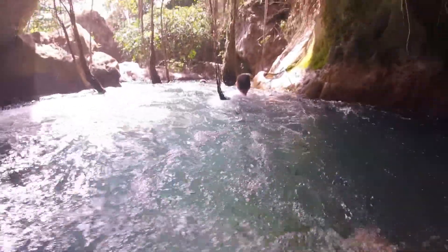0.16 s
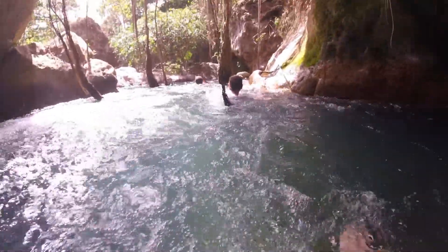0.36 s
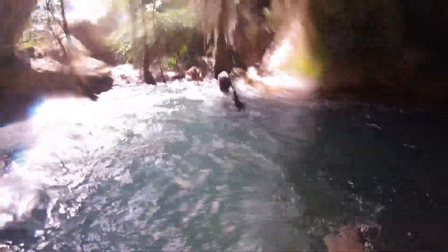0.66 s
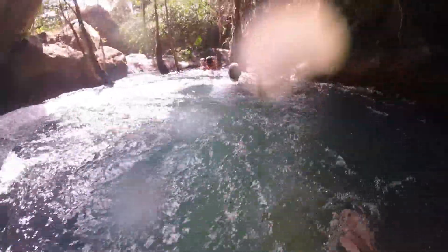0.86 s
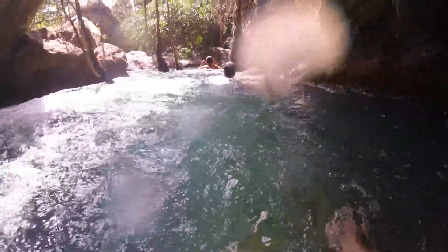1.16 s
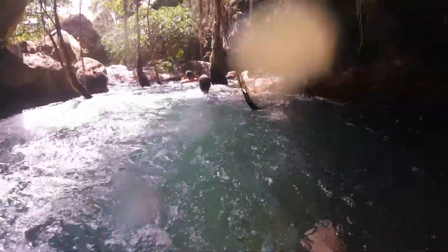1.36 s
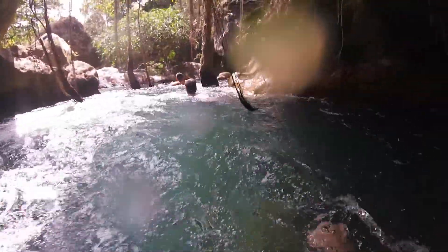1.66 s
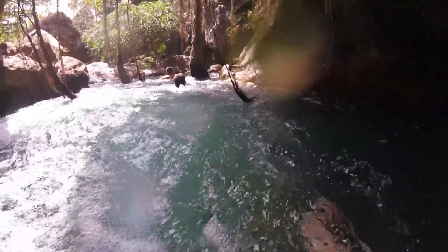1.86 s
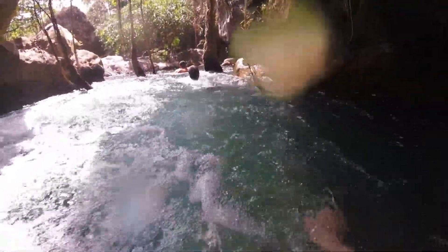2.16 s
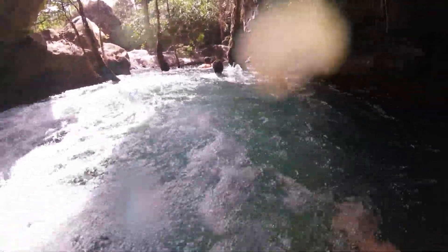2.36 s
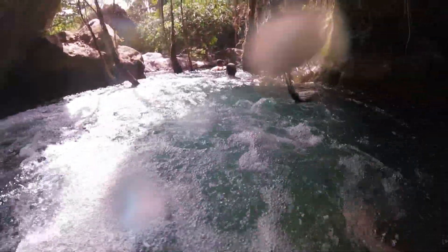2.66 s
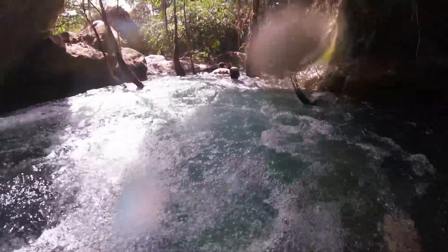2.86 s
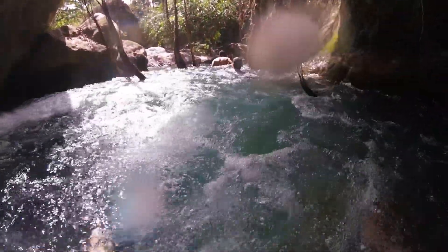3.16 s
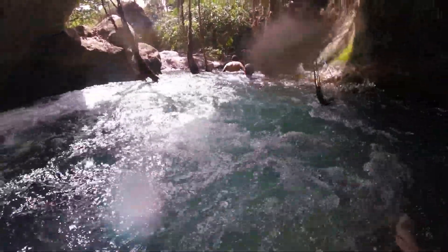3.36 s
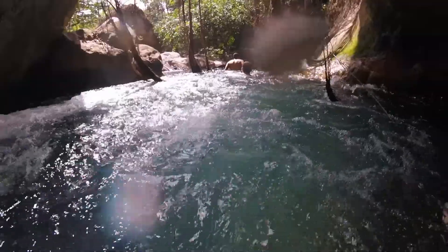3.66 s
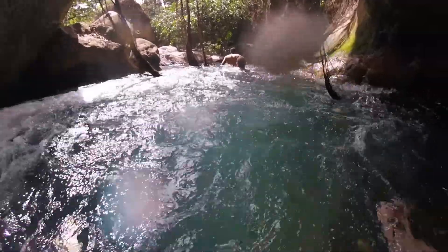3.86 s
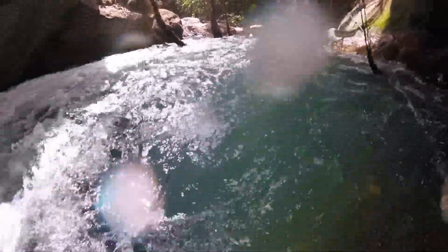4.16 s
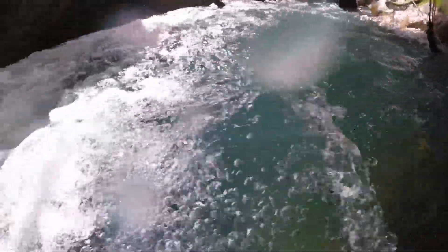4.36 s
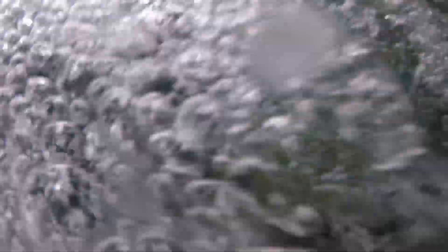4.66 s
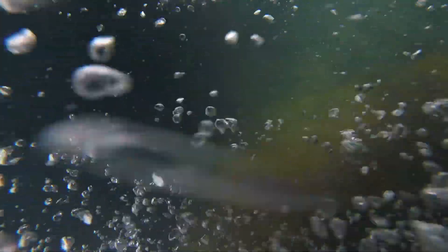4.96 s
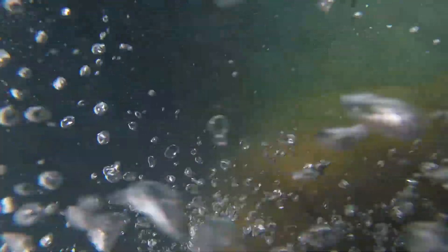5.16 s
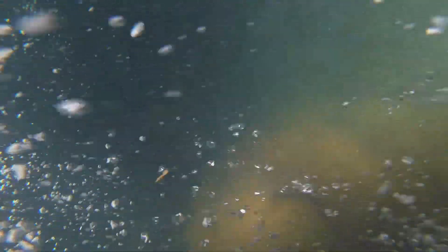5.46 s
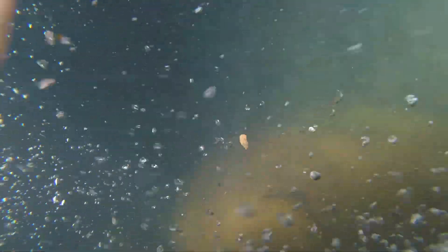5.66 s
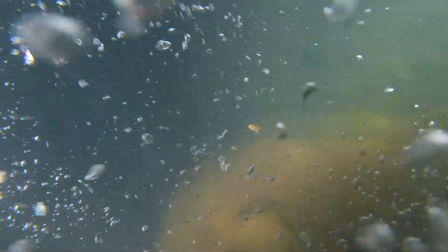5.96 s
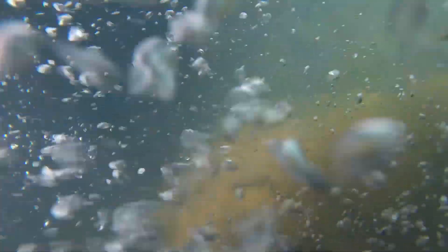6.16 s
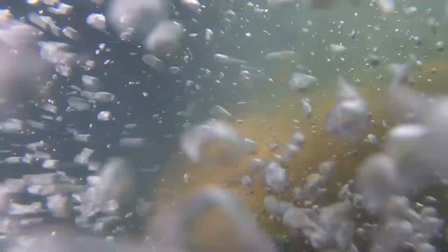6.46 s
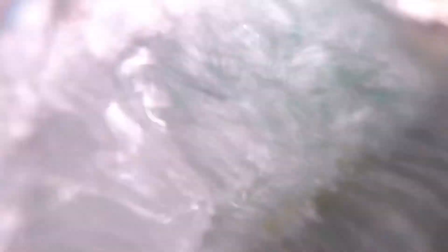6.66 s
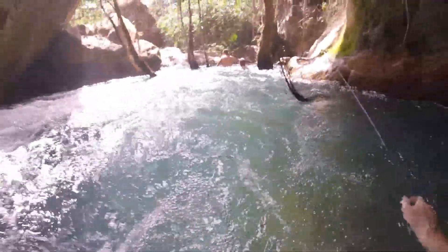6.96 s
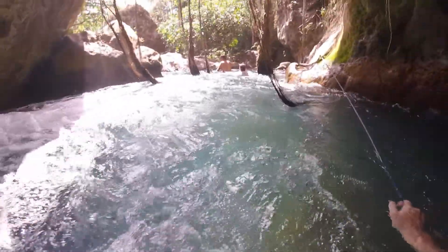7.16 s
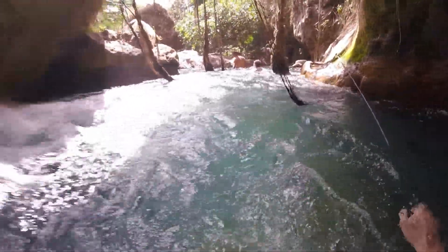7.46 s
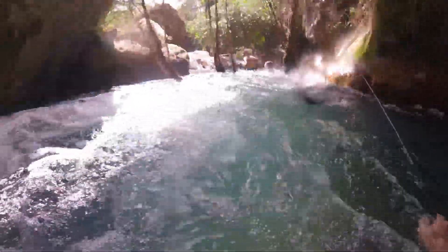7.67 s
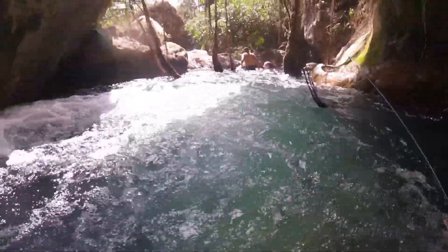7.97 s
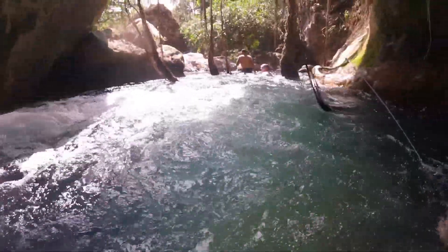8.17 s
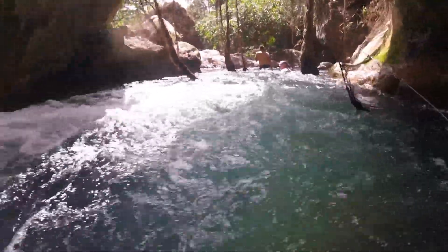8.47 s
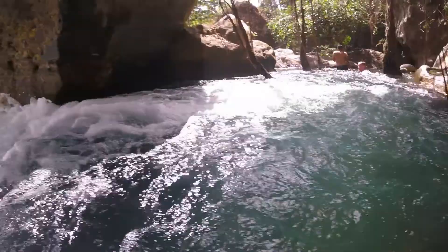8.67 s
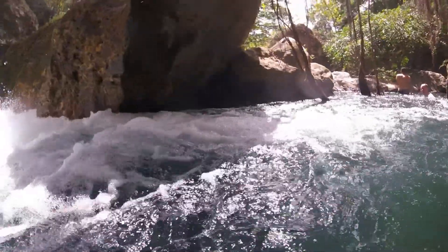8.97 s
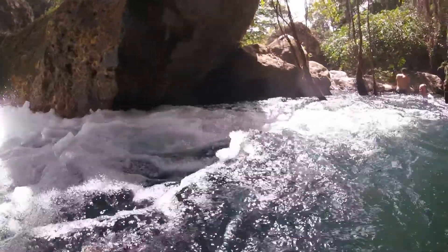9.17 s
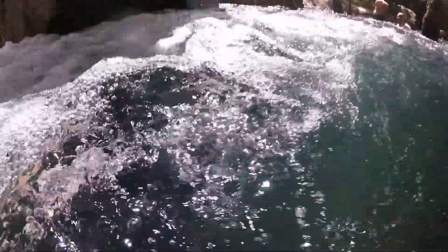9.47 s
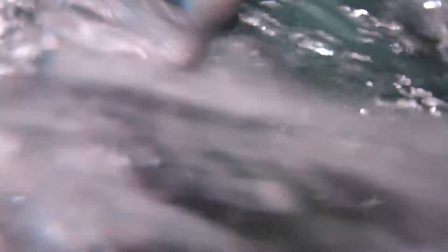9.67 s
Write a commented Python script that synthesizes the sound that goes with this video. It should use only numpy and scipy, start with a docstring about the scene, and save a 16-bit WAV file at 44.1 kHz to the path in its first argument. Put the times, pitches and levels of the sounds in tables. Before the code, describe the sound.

A small waterproof camera bobs in a waterfall pool, its sound narrow and mono. From 0 s the water is soft and muffled, gradually rising; at about 1.2 s a film bursts and bright, airy hiss opens over a lumpy low roar, swelling until 4.7 s. Low slaps knock the housing near 1.3 and 3.8 s, and running drops briefly bend the hiss downward at 3.2, 3.5 and 4.4 s. Around 4.75-5 s foam splutters, drops tick and pockets gurgle. From 5 to 6.65 s it is underwater: dull rumble, a short hum of trapped air, close plops and pops thickening after 6.1 s, with fizz. It surfaces quiet and clogged, thumped at 7, 7.5 and hardest 8.15 s, when the hiss snaps back. It rushes steadily until 9.55 s, slaps and gurgles, then plunges around 9.7 s with a sharp bubble burst into near silence.

```python
"""A waterfall, heard from its pool through the narrow microphone port of a small bobbing waterproof camera.
Above water it is noise: lumpy roar, spray, a resonance of the port that moves with the water in it, and a fine
high hiss called mist. The camera dips under the foam twice: a dull rumble, bubbles and a hum of trapped air remain.
Water slaps the housing as short low swings; single bubbles, cracks and flung drops sound close to the port.
One microphone, copied to both channels, with a faint hiss and its top cut."""
import sys
import numpy as np
from scipy import signal
from scipy.fft import rfft, irfft, next_fast_len
from scipy.io import wavfile
from scipy.ndimage import uniform_filter1d

SR = 44100
rng = np.random.default_rng(int(sys.argv[2]) if len(sys.argv) > 2 else 0)


def digitize_waveform(pressure):
    """Quantize a signal to 16-bit integers and store it at the path in sys.argv[1].

    Rows of a 2-D input are taken as channels; values are limited to [-1, 1].
    """
    field = np.atleast_2d(pressure).T
    bounded = np.clip(field, -1, 1)
    quanta = np.round(bounded * 32767).astype(np.int16)
    wavfile.write(sys.argv[1], SR, quanta)


N = 433062


def from_db(db):
    """Decibels to gain."""
    return 10 ** (np.asarray(db) / 20)


def rms_one(x):
    """Scale to rms 1."""
    return x / np.sqrt(np.mean(x ** 2) + 1e-20)


def gains(spans):
    """Level columns as gains in time, silent between the spans, with 4 ms fades."""
    t, out = np.arange(N) / SR, 0
    for rows in spans:
        s, *columns = np.transpose(rows)
        inside = np.clip(np.minimum(t - s[0] + .004, s[-1] + .004 - t) / .004, 0, 1)
        out = out + inside * from_db([np.interp(t, s, column) for column in columns])
    return out


def at_hz(points, hz):
    """Read a spectrum in dB on a log frequency axis."""
    points = np.array(points)
    return np.interp(np.log(hz + 1), np.log(points[:, 0]), points[:, 1])


def drift(rate_hz):
    """Slow random wander with spread 1: noise through two equal low-pass poles, one step per 40 samples."""
    r = np.exp(-80 * np.pi * rate_hz / SR)
    noise = rng.standard_normal(N // 40 + 2002)
    slow = signal.lfilter([1], [1, -2 * r, r * r], noise)[2000:]   # skip the settling of the filter
    return np.interp(np.arange(N) / 40, np.arange(len(slow)), rms_one(slow))


def coloured(spectrum):
    """Noise with a steady spectrum; rms 1."""
    size = next_fast_len(N)
    hz = np.arange(size // 2 + 1) * SR / size
    shaped = rfft(rng.standard_normal(size)) * from_db(at_hz(spectrum, hz))
    return rms_one(irfft(shaped, size)[:N])


def moving_colour(shape_db, low_hz, high_hz):
    """Noise whose spectrum shape_db(Hz, s) changes in time; each frame is levelled to rms 1 in the band given."""
    hz, s, frames = signal.stft(rng.standard_normal(N), SR, nperseg=512, noverlap=384)
    gain = from_db(shape_db(hz[:, None], s))
    band = (hz > low_hz) & (hz < high_hz)
    gain = gain / np.sqrt(np.sum(gain[band] ** 2, axis=0) / len(hz))
    return signal.istft(frames * gain, SR, nperseg=512, noverlap=384)[1][:N]


def ring(clicks, hz, t60):
    """A two-pole resonance: a unit click sets a sine of height 1 ringing, 60 dB down after t60 seconds."""
    r, w = from_db(-60 / (t60 * SR)), 2 * np.pi * hz / SR
    return signal.lfilter([0, np.sin(w)], [1, -2 * r * np.cos(w), r * r], clicks + 1e-18)


def peak(s, when, rise_s, fall_s):
    """A triangle of height 1."""
    return np.interp(s, [when - rise_s, when, when + fall_s], [0, 1, 0])


# The sway of the housing in the swell. Each row: frequency in Hz, density in dB per Hz (relative).
BOB_SPECTRUM = [(10, -24.5), (22, 3), (40, -5.5), (70, -13.5), (150, -78)]
BOB_DB = -37


def bobbing():
    """The housing bobs in the swell: the lowest noise, fading where both roar and rumble are very quiet."""
    roar, rumble = gains(ABOVE)[0], gains(BELOW)[0]
    open_port = np.clip(roar / from_db(-37.5) + rumble / from_db(-48), 0, 1)
    return open_port * from_db(BOB_DB + 2.0 * drift(2.9)) * coloured(BOB_SPECTRUM)


# Air caught under the housing, by the microphone.
# Each row: start in seconds, length in seconds, resonance in Hz, level in dB before its lumps.
TRAPPED = [(5.066, 0.27, 590, -33), (5.298, 0.58, 356, -39)]
TRAPPED_CYCLES = 8.1   # t60 of the resonance, in cycles


def trapped_air():
    """Trapped air hums while bubbles shake it: lumpy noise in one resonance, quick to start, fading at the end."""
    out, lumps = np.zeros(N), from_db(4.2 * drift(22))
    for s, length, hz, level_db in TRAPPED:
        t, t60 = np.arange(round(length * SR)) / SR, TRAPPED_CYCLES / hz
        once = ring(rng.standard_normal(SR), hz, t60)
        hum = rms_one(ring(once, hz, t60))[-len(t):]
        shape = np.interp(t, [0, .01, 0.72 * length, length], [0, 1, 1, 0])
        out[round(s * SR):][:len(t)] += shape * from_db(level_db) * hum
    return lumps * out


def swarm(per_s, low_hz, high_hz, cycles, spread_db):
    """Bubbles are born in clumps, each with a random loudness and one of twelve pitches; the flooded port dulls them."""
    loudness = from_db(spread_db * np.minimum(rng.exponential(1, N), 4)) * rng.choice([-1, 1], N)
    born = rng.random(N) < per_s * from_db(4.0 * drift(14)) / SR
    dealt = rng.integers(0, 12, N)   # which of the twelve pitches each bubble takes
    pitches = np.geomspace(low_hz, high_hz, 12)
    rings = sum(ring(loudness * born * (dealt == k), hz, cycles / hz) for k, hz in enumerate(pitches))
    dulling = signal.butter(4, 0.84 * high_hz, fs=SR, output="sos")
    return rms_one(signal.sosfilt(dulling, rings))


# Microphone under water, one list per dip. Each row: time in seconds, rumble in dB before its lumps,
# big bubbles in dB, middle bubbles in dB before a 5.5 dB lift, fizz in dB.
BELOW = [
    [(5.008, -25, -35, -42, -52), (5.06, -19, -31.5, -54, -75), (5.15, -27.5, -30.5, -56, -70),
     (5.32, -29, -35.5, -41.5, -57), (5.4, -34, -28.5, -46, -54), (5.5, -33.5, -35, -43.5, -66),
     (5.63, -30, -28.5, -36, -47), (5.72, -28.5, -37, -41.5, -62), (5.8, -32.5, -31, -45.5, -59),
     (6.0, -36, -35.5, -41.5, -65), (6.14, -30, -26, -37.5, -45), (6.24, -31, -29, -31, -60),
     (6.3, -36, -36.5, -42.5, -44), (6.42, -32, -35.5, -37.5, -58), (6.52, -37, -36, -38, -51.5),
     (6.6, -19, -41, -27.5, -40), (6.66, -44, -54, -36, -53), (6.72, -42, -57, -59, -66),
     (6.9, -54, -51, -53, -71)],
    [(9.741, -35, -47, -42, -44), (9.75, -17, -19.5, -37, -44), (9.768, -18.5, -29, -13.5, -29),
     (9.776, -40, -31, -50, -45), (9.82, -38, -38, -40, -39)],
]
# Rumble heard through the water. Each row: frequency in Hz, density in dB per Hz (relative).
RUMBLE_SPECTRUM = [(15, -19), (30, 22), (100, 23.5), (250, 16), (500, -53)]
RUMBLE_LUMPS_DB = 3.0


def underwater():
    """Dull rumble and bubbles in three ranges of pitch; the highest merge into a fine fizz."""
    rumble, big, middle, fizz = gains(BELOW)
    out = rumble * from_db(RUMBLE_LUMPS_DB * drift(4.0)) * coloured(RUMBLE_SPECTRUM)
    out += big * swarm(180, low_hz=276, high_hz=842, cycles=14.0, spread_db=2.0)
    out += middle * from_db(5.5) * swarm(950, low_hz=730, high_hz=1904, cycles=18.7, spread_db=3.5)
    return out + fizz * swarm(900, low_hz=1940, high_hz=3720, cycles=26.0, spread_db=6.5)


# Water against the housing. Each row: centre in seconds, peak in dB, frequency in Hz,
# half length of the swell in cycles (to where it is down to exp(-2)).
SLAPS = [(0.021, -21.5, 50, 0.74), (.96, -18.5, 69.5, 0.82), (1.258, -13, 48, 0.65),
         (3.791, -10, 44.6, 0.29), (4.848, -22, 44.6, 0.68), (4.931, -14.5, 75, 0.7),
         (5.179, -12, 46.7, 0.6), (6.126, -18, 79.6, 1.2), (6.154, -14.5, 111.6, 1.4),
         (6.555, -20, 69.5, 1.2), (6.597, -19.5, 36.3, 0.76), (6.974, -23.5, 155, 1.4),
         (6.99, -12, 59.8, 0.14), (7.443, -10.5, 56.6, 1.05), (7.584, -11.5, 40.5, 1.35),
         (8.015, -16.5, 57.7, 1.5), (8.123, -25, 152.4, 9.2), (8.164, -7, 59, 0.81), (9.572, -14, 70, 0.71),
         (9.598, -14, 90, 1)]


def slaps():
    """A wave pushes the housing in and it swings back: a low cosine under a bell-shaped swell."""
    out, t = np.zeros(N), np.arange(N) / SR
    for s, level_db, hz, cycles in SLAPS:
        near = slice(max(round((s - .1) * SR), 0), round((s + .1) * SR))
        turns = (t[near] - s) * hz
        out[near] += from_db(level_db) * np.cos(2 * np.pi * turns) * np.exp(-2 * (turns / cycles) ** 2)
    return out


# Single bubbles at the port. Each row: start in seconds, level in dB before swell and decay,
# starting pitch in Hz, t60 in seconds.
POPS = [(.123, -28, 1800, 0.022), (4.864, -14, 895, .027), (4.913, -22, 5200, 0.013),
        (4.925, -14, 340, 0.024), (4.959, -18, 2450, 0.02), (4.973, -16.5, 2100, .014),
        (5.0088, -13.5, 795, 0.02), (5.0176, -5.5, 530, 0.023), (5.034, -5.5, 530, 0.024),
        (5.0386, 4.5, 533, 0.015), (5.05, -7, 253, 0.037), (5.075, -23, 610, 0.027),
        (5.102, -17, 594, 0.12), (5.172, -4, 302, 0.015), (5.211, -21, 566, 0.045), (5.222, -18, 535, 0.05),
        (5.235, -21.5, 593, 0.032), (5.273, -13, 519, 0.055), (5.319, -9.5, 328, 0.06),
        (5.338, -27, 1600, .015), (5.386, -25, 1490, 0.017), (5.436, -15, 316, 0.032),
        (5.508, -12, 583, 0.036), (5.582, -18.5, 335, 0.05), (5.584, -18, 700, 0.043),
        (5.625, -8.5, 390, 0.031), (5.657, -24.5, 2950, 0.015), (5.704, -18.5, 1310, 0.029),
        (5.708, -15.5, 350, 0.08), (5.783, -16.5, 2130, 0.022), (5.827, -17, 370, 0.036),
        (5.831, -15.5, 790, 0.018), (5.865, -32, 2680, .02), (5.882, -12.5, 585, 0.05),
        (5.929, -6.5, 472, 0.033), (5.931, -12.5, 910, 0.048), (5.974, -17.5, 700, 0.043),
        (5.978, -41, 2900, .012), (6.04, -38, 3340, .012), (6.023, -24, 1580, 0.025),
        (6.085, -15.5, 527, 0.037), (6.094, -16.5, 1100, 0.028), (6.093, -23.5, 2190, 0.029),
        (6.133, -19, 305, .036), (6.136, -10, 930, 0.026), (6.159, -18, 1280, 0.022),
        (6.171, -10, 770, 0.025), (6.185, -4, 544, 0.031), (6.211, -5.5, 950, .027),
        (6.236, -18, 1290, 0.022), (6.238, -14, 895, 0.03), (6.265, -15, 913, 0.035),
        (6.2745, -33, 2900, 0.01), (6.297, -30, 2700, 0.013), (6.298, -22, 1640, .02),
        (6.314, -19, 1100, .02), (6.32, -18, 706, 0.021), (6.351, -6, 1200, 0.037), (6.354, -6, 1495, 0.02),
        (6.382, -9, 516, 0.037), (6.386, -10.5, 860, 0.027), (6.412, -17.5, 1200, 0.045),
        (6.462, -12, 936, 0.029), (6.517, -16.5, 625, 0.034), (6.536, -18, 1540, .02),
        (6.573, -14, 865, .028), (6.611, -13.5, 1320, .025), (6.645, -33, 2930, 0.016),
        (6.651, -11.5, 1470, 0.026), (6.665, -20, 1150, 0.025), (6.681, -33.5, 2620, 0.022),
        (9.561, -14.5, 2815, .014), (9.628, -9.5, 246, 0.046), (9.629, -11, 1120, 0.018),
        (9.643, -22, 1850, .012), (9.677, -20, 4750, .01), (9.743, -3, 850, 0.015),
        (9.746, -3, 1038, 0.033), (9.7511, -4, 980, 0.043), (9.7607, -1.5, 1190, 0.031),
        (9.767, -3, 1150, .013), (9.768, -15, 2390, .015), (9.775, -25, 950, .012), (9.797, -14, 1270, .01),
        (9.804, -7, 1050, 0.0057), (9.8095, -16, 1000, .008)]
POP_SWELL_CYCLES = 0.32


def pops():
    """Each bubble swells within a cycle or so and rings down with rising pitch."""
    out, t = np.zeros(N + 8192), np.arange(8192) / SR
    for s, level_db, hz, t60 in POPS:
        phase = 2 * np.pi * hz * (t + 0.86 * t * t)
        swell = (1 - np.exp(-t * hz / POP_SWELL_CYCLES)) ** 2
        out[round(s * SR):][:8192] += np.sin(phase) * swell * from_db(level_db - 60 * t / t60)
    return out[:N]


def bursts(events, t60):
    """A puff of white noise at each event, dying at once."""
    out, t = np.zeros(N + 2048), np.arange(2048) / SR
    for (s, level_db), noise in zip(events, rng.standard_normal((len(events), 2048))):
        out[round(s * SR):][:2048] += noise * from_db(level_db - 60 * t / t60)
    return out[:N]


# Bubbles pinching off sharply by the port. Each row: time in seconds, level in dB before dulling.
CRACKS = [(4.864, -27), (4.925, -20), (4.959, -34), (4.973, -40), (5.009, -28), (5.019, -33), (5.035, -33),
          (5.039, -20), (5.783, -28), (5.93, -35), (6.351, -20.5), (6.65, -35), (9.561, -36), (9.628, -30),
          (9.747, -18), (9.761, -14), (9.764, -23), (9.768, -19), (9.797, -32), (9.804, -29)]
# Flung drops on the microphone capsule. Each row: time in seconds, level in dB before the band filter.
STRIKES = [(4.7922, 2.5), (4.7972, 5.5), (4.8626, 0.5), (4.868, -9), (4.9094, -9), (4.9449, -4), (9.56, -7)]
CRACK_T60_S, STRIKE_T60_S, STRIKE_BAND_HZ = .005, 0.016, (6160, 6770)


def cracks():
    """Pinch-off cracks are dulled by the water; drop strikes sound around the pitch of the capsule."""
    dull = signal.lfilter(*signal.butter(3, 4200, fs=SR), bursts(CRACKS, CRACK_T60_S))
    strikes = bursts(STRIKES, STRIKE_T60_S)
    return dull + signal.lfilter(*signal.butter(2, STRIKE_BAND_HZ, "band", fs=SR), strikes)


# Each time the microphone comes up. Each row: breaks the surface in seconds, film over the port bursts
# in seconds, drain time in seconds (e-fold), how far low the ring starts in Hz, treble in the first moment in dB.
SURFACINGS = [(-.03, 1.217, 0.34, 1340, 15), (6.666, 8.175, 0.28, 200, -12)]


def since_burst(s, lasts_s):
    """1 while the film seals the port, dying away once it bursts."""
    out = np.ones(len(s))
    for (up, burst, *_), lasts in zip(SURFACINGS, np.broadcast_to(lasts_s, 2)):
        out = np.where(s > up, np.exp(-np.maximum(s - burst, 0) / lasts), out)
    return out


# Drops running across the port, pulling its ring down.
# Each row: centre in seconds, fall of the ring in Hz, half length in seconds.
DROPS = [(3.228, 1030, 0.093), (3.513, 430, 0.08), (4.395, 1380, 0.056), (9.632, 1200, 0.064)]


def drops(s):
    """How far each drop covers the port, 0-1."""
    cover = np.array([peak(s, when, half, half) for when, _, half in DROPS])
    return np.sin(np.pi / 2 * cover) ** 2


# Resonance of the microphone port. Each row: time in seconds,
# top of its ring in Hz before the sweep after a burst and the drops.
PORT_RING = [(1.2, 5690), (1.7, 6293), (2.3, 6234), (3.15, 6040), (3.98, 5940), (4.04, 6420), (4.4, 6300),
             (4.47, 7800), (4.54, 9100), (4.66, 8870), (4.75, 9300), (4.82, 7800), (5.0, 8260), (8.1, 6100),
             (8.6, 5850), (9.3, 6010), (9.42, 6280), (9.6, 6160), (9.69, 7400), (9.72, 8300)]
CAPSULE_HZ = 6500   # fixed resonance of the capsule
SWEEP_S = 0.13   # the ring climbs to its place after a burst
ON_CAPSULE_HZ, PAST_CAPSULE_HZ = 400, 990   # how near counts as on the capsule, from below and from above
SEALED_TOP_HZ, SEALED_WIDTH_HZ = 6660, 9000
# width of a 6 kHz ring, e-fold per this much higher, its limit; share of narrowing on the capsule
WIDTH_HZ, WIDENS_HZ, WIDEST_HZ, SHARPENS = 1500, 1300, 4000, 0.7


def port(s):
    """Port state at times s: ring on the capsule 0-1, film 0-1, top of the ring Hz, its width below Hz."""
    _, burst, drains, low_hz, _ = np.transpose(SURFACINGS)
    top = np.interp(s, *np.transpose(PORT_RING))
    top = top - sum(hz * peak(s, when, 1, SWEEP_S) for when, hz in zip(burst, low_hz))
    top = top - np.array(DROPS)[:, 1] @ drops(s)
    reach = np.where(top < CAPSULE_HZ, ON_CAPSULE_HZ, PAST_CAPSULE_HZ)
    on_capsule = 1 / (1 + ((top - CAPSULE_HZ) / reach) ** 2)
    width = np.minimum(WIDTH_HZ * np.exp((top - 6000) / WIDENS_HZ), WIDEST_HZ)
    width = width * (1 - SHARPENS * on_capsule)
    sealed = since_burst(s, OPENS_S) == 1
    on_capsule = on_capsule * ~sealed * (1 - drops(s).max(axis=0))
    top, width = np.where(sealed, SEALED_TOP_HZ, top), np.where(sealed, SEALED_WIDTH_HZ, width)
    return on_capsule, since_burst(s, drains), top, width


SOFTENS_HZ = 1800   # the upper edge spreads e-fold per this much higher


def edge_spread(s):
    """A low ring has a tight upper edge, a high one a wide edge."""
    _, _, top, _ = port(s)
    return np.clip(np.exp((top - 6000) / SOFTENS_HZ), .3, 1.25)


# Pockets of air in the foam, ringing as they close over the port.
# Each row: start in seconds, length in seconds, from Hz, to Hz, lift in dB.
POCKETS = [(4.01, 0.085, 2400, 2450, 11.5), (4.766, 0.12, 1700, 5000, 9), (4.83, 0.076, 1850, 1350, 24),
           (4.878, 0.059, 1070, 2570, 18), (4.916, 0.056, 2730, 2400, 18), (9.621, 0.023, 895, 1300, 13)]


def pockets_db(hz, s):
    """Each pocket lifts a gliding band of the spray, swelling and dying; without hz, the lift on top of the band."""
    out = 0
    for when, length, from_hz, to_hz, lift_db in POCKETS:
        done = np.clip((s - when) / length, 0, 1)
        centre = from_hz + (to_hz - from_hz) * done
        off = 0 if hz is None else (hz / centre - 1) / .16
        out = out + lift_db * np.sin(np.pi * done) / (1 + off ** 2)
    return out


# foam covers the port in patches
CHURN_FROM_S, CHURN_TO_S, CHURN_PATCH_DB, CHURN_RING_DB = 4.735, 5.0, 7.5, -6


def churning(s):
    """True while foam churns over the port."""
    return (s > CHURN_FROM_S) * (s < CHURN_TO_S)


def patches_db(hz, s):
    """Patches about 1.5 kHz by 15 ms come and go while foam churns over the port."""
    field = rng.standard_normal((len(hz), len(s)))
    for axis, size in enumerate((16, 5)):   # bins, frames; smoothed twice
        field = uniform_filter1d(uniform_filter1d(field, size, axis=axis), size, axis=axis)
    return CHURN_PATCH_DB * rms_one(field) * churning(s)


# Spray through the open port and through a wet one. Each row: frequency in Hz, density in dB per Hz (relative).
SPRAY_OPEN = [(200, -7.5), (500, 6), (1000, 0.5), (1600, -3), (2400, -4), (3200, -5), (4000, -11.5),
              (5000, -6.5), (7000, -50)]
SPRAY_WET = [(200, -39.5), (500, 3.5), (850, -1.5), (1300, 1), (1600, 3.5), (1850, 7), (2150, 0.5),
             (2500, -3.5), (3100, -8.5), (3700, -19), (4500, -40.5), (7000, -70.5)]


def spray_shape(hz, s):
    """A film of water weighs the membrane down: one low hump and no treble."""
    _, film, _, _ = port(s)
    film = np.clip(film, 0, 1)
    wet, clear = from_db(2 * at_hz(SPRAY_WET, hz)), from_db(2 * at_hz(SPRAY_OPEN, hz))   # powers
    plain = 10 * np.log10(film * wet + (1 - film) * clear)
    return plain + pockets_db(hz, s) + patches_db(hz, s)


RING_FALL_DB_PER_KHZ = 5   # extra fall once the film has burst, for an edge of spread 1
EDGE_S, LEAK_DB = 0.12, -15.5   # thin hiss still leaks past the ring this long after the burst (e-fold)
CAPSULE_WIDTH_HZ, CAPSULE_LIFT_DB = 300, 6.0   # lift while the ring sits at or below the capsule
CREST_WIDTH_HZ, CREST_DB = 797, 5.0   # a ring far above the capsule peaks at its top


def ring_shape(hz, s):
    """The air in the port rings: a slow rise to its top, a steep fall above; film damps capsule and crest."""
    _, film, top, width = port(s)
    clear = 1 - np.clip(film, 0, 1)
    above = hz - top
    rise = -20 * np.log10(1 + (np.minimum(above, 0) / width) ** 2)
    leak = since_burst(s, EDGE_S)
    over = np.maximum(above, 0) / 1000 / edge_spread(s)
    fall = 6.7 * over + (leak < 1) * (RING_FALL_DB_PER_KHZ * over + 18.0 * over ** 2)
    fall = np.minimum(fall, 62.0 * (1 - leak) - LEAK_DB + 2.0 * over)
    apart = np.clip((top - CAPSULE_HZ) / 2000, 0, 1)   # the capsule stands out once the ring has left it
    capsule = CAPSULE_LIFT_DB * clear * (1 + 1.3 * apart)
    capsule = capsule / (1 + ((hz - CAPSULE_HZ) / CAPSULE_WIDTH_HZ) ** 2)
    crest = CREST_DB * apart * clear * (s < CHURN_FROM_S) / (1 + (above / CREST_WIDTH_HZ) ** 2)
    low_cut = 24 * np.log2(np.clip(4000 / (hz + 1), 1, 8))   # 24 dB per octave below 4 kHz
    return rise - fall + capsule + crest + patches_db(hz, s) - low_cut


# Mist, the fine high hiss, with the ring at 6.1 kHz. Each row: frequency in Hz, density in dB per Hz (relative).
MIST_SPECTRUM = [(4000, -39.5), (6000, 9), (8500, 8.5), (10000, -6.5), (11300, -0.5), (12000, -9.5),
                 (12800, -56)]
MIST_FOLLOWS = 0.64   # the mist shifts with this power of the ring's pitch
GAP_SHALLOWER = 0.75   # share by which the gap gets shallower during a drop


def mist_shape(hz, s):
    """Mist is a fine high hiss with a gap above the ring, shallower during drops."""
    on_capsule, _, top, _ = port(s)
    off = ((hz - top) / edge_spread(s) - 1100) / 700
    off = np.where(off > 0, off / (1 + 0.97 * on_capsule), off)   # the gap in the hiss is wider at this pitch
    gap_db = 34.4 * (1 - GAP_SHALLOWER * drops(s).max(axis=0)) * (1 - since_burst(s, SWEEP_S))
    return at_hz(MIST_SPECTRUM, hz * (6100 / top) ** MIST_FOLLOWS) - gap_db / (1 + off ** 2)


# Roar of the fall at the microphone by time, in two lists; the last rows are the haze that lingers
# after the camera dips. Each row: time in seconds, roar in dB before sloshes and swells.
ABOVE = [
    [(0, -41.5), (.12, -40.5), (.3, -38), (.7, -33.5), (1.4, -27), (2.75, -22), (3.7, -20.5), (3.97, -24),
     (4.32, -22.5), (4.56, -21.5), (4.728, -22), (4.736, -34), (4.76, -25.5), (4.9, -28), (4.955, -25),
     (4.965, -38), (5.0, -43)],
    [(6.68, -41), (6.71, -42.5), (6.82, -43), (6.92, -38), (7.18, -35.5), (8.115, -28), (8.15, -33.5),
     (9.1, -24), (9.5, -25.5), (9.66, -22), (9.69, -25), (9.695, -53), (9.735, -58), (9.765, -31),
     (9.785, -75), (9.82, -42)],
]
# Foam sloshing over the port before it goes under.
# Each row: time in seconds, change of the treble in dB, lift of the spray in dB.
SLOSHES = [(4.796, 7, 14), (4.832, -5.5, 11.5), (4.868, 15, 9), (4.927, -16, 11), (4.946, -21, 3)]
SLOSH_RISE_S, SLOSH_FALL_S, SLOSH_ROAR_DB, SLOSH_MIST_DB = 0.0022, 0.0052, 8.5, 21
# levels against the roar (dB): port open, then changes while sealed, with the ring on the capsule, while wet
SPRAY_DB, RING_DB, MIST_DB = (-11.5, 1.5, 1, 8.5), (-10, -17, 12.5, -10), (-28, -31, -4.5, -13.5)
OPENS_S, WAKES_S, WAKES_DB = 0.046, 0.16, -8.5   # treble comes through after a burst; spray wakes after surfacing
# with a ring this high the mist is much quieter and the ring slightly louder
HIGH_RING_HZ, HIGH_MIST_DB, HIGH_RING_DB = 7950, -38, 2
POCKET_SHARE = 0.43   # share of a pocket's lift that makes the whole spray louder
DROP_MIST_DB = -2.5


def levels_above():
    """Spray, ring and mist are set against the roar by the state of the port; sloshes shift them all."""
    s = np.arange(0, N + 40, 40) / SR
    on_capsule, film, top, _ = port(s)
    shut = since_burst(s, OPENS_S)
    slosh = np.array([peak(s, when, SLOSH_RISE_S, SLOSH_FALL_S) for when, *_ in SLOSHES])
    any_slosh = slosh.max(axis=0)
    treble_db, splash_db = np.array(SLOSHES)[:, 1:].T @ slosh
    waking = np.array([(s > up) * np.exp(-np.abs(s - up) / WAKES_S) for up, *_ in SURFACINGS])
    high_ring = (1 - shut) * np.clip((top - HIGH_RING_HZ) / 1000 + .5, 0, 1)
    state = np.array([1 + 0 * s, shut, on_capsule, film])
    spray = SPRAY_DB @ state + POCKET_SHARE * pockets_db(None, s)
    spray = spray + WAKES_DB * waking.sum(axis=0) + splash_db
    ringing = RING_DB @ state + treble_db + HIGH_RING_DB * high_ring + CHURN_RING_DB * churning(s)
    ringing = ringing + np.array(SURFACINGS)[:, -1] @ waking
    mist = MIST_DB @ state + HIGH_MIST_DB * high_ring
    mist = mist + DROP_MIST_DB * drops(s).sum(axis=0) + SLOSH_MIST_DB * any_slosh
    rows = SLOSH_ROAR_DB * any_slosh, spray, ringing, mist
    return gains(ABOVE) * from_db([np.interp(np.arange(N) / SR, s, db) for db in rows])


# Roar of the fall. Each row: frequency in Hz, density in dB per Hz (relative).
ROAR_SPECTRUM = [(15, -32.5), (28, 0), (50, -2.5), (90, 3.5), (130, -2), (180, 0.5), (270, -4), (400, -8.5),
                 (700, -20), (1200, -30), (2500, -77)]


def waterfall():
    """Roar in lumps, spray and mist as dense hiss, and the ring of the port; each layer swells by chance."""
    roar, spray, ringing, mist = levels_above()
    surge = drift(22.5)   # shared by roar and spray
    out = roar * from_db(-1.0 + 0.13 * surge + 1.0 * drift(3.6)) * coloured(ROAR_SPECTRUM)
    spray = spray * from_db(0.59 * surge + 0.24 * drift(32))
    out += spray * moving_colour(spray_shape, low_hz=1200, high_hz=3660)
    out += ringing * from_db(0.8 * drift(22)) * moving_colour(ring_shape, low_hz=4350, high_hz=10240)
    out += mist * from_db(1.2 * drift(15)) * moving_colour(mist_shape, low_hz=10000, high_hz=13600)
    return out


def scene():
    """One microphone, copied to both channels."""
    water = waterfall() + underwater() + trapped_air() + bobbing() + pops() + cracks() + slaps()
    return np.tile(water, (2, 1))


CUTOFF_HZ = 13400   # from here up the top is 70 dB down


def record(dry):
    """The microphone adds a faint hiss of its own, and the top is cut."""
    hiss = from_db(-87.0) * coloured([(20, -17.0), (1000, 17.5), (12000, -26.5)])   # (Hz, dB per Hz)
    top_cut = signal.cheby2(12, 70, CUTOFF_HZ, fs=SR, output="sos")
    return signal.sosfilt(top_cut, dry + hiss)


dry = scene()
out = record(dry)
digitize_waveform(out)
```